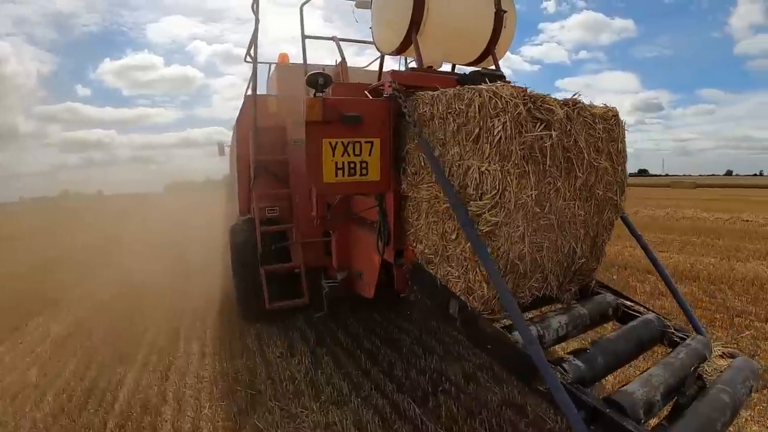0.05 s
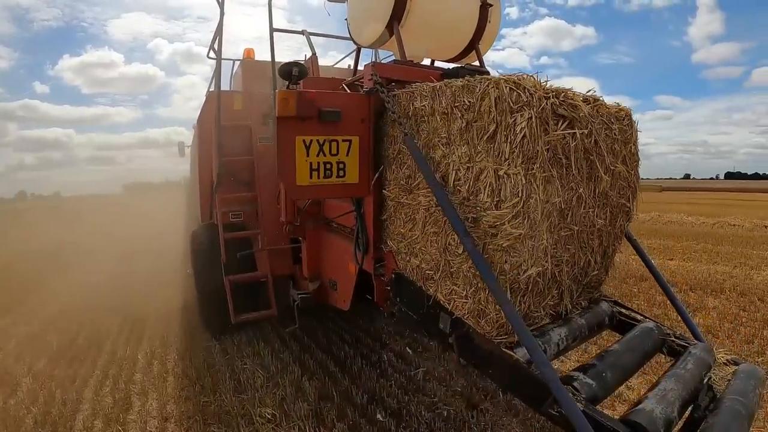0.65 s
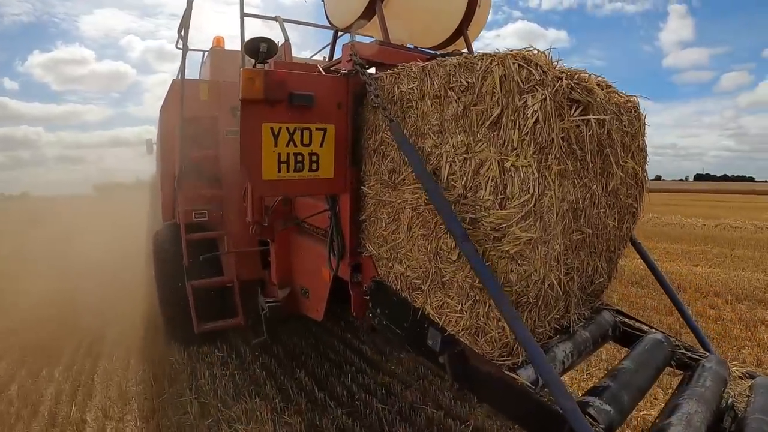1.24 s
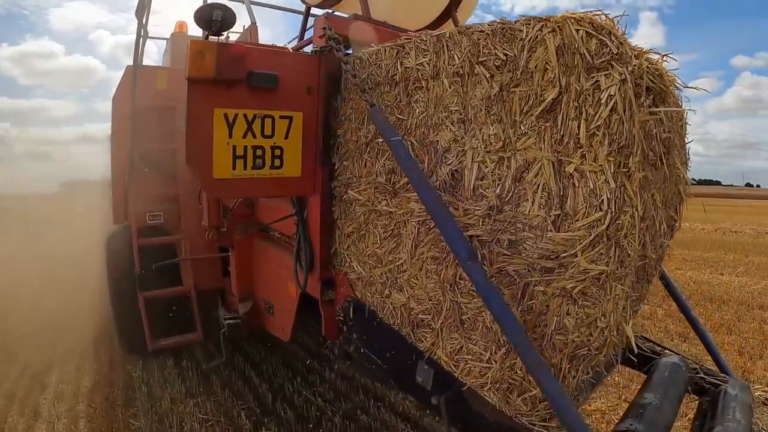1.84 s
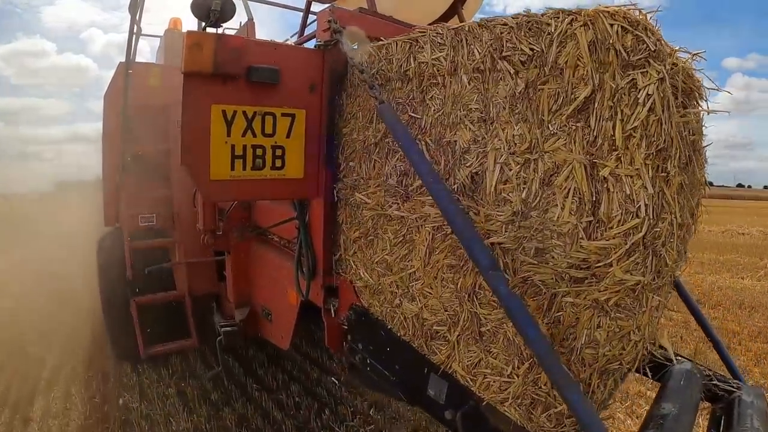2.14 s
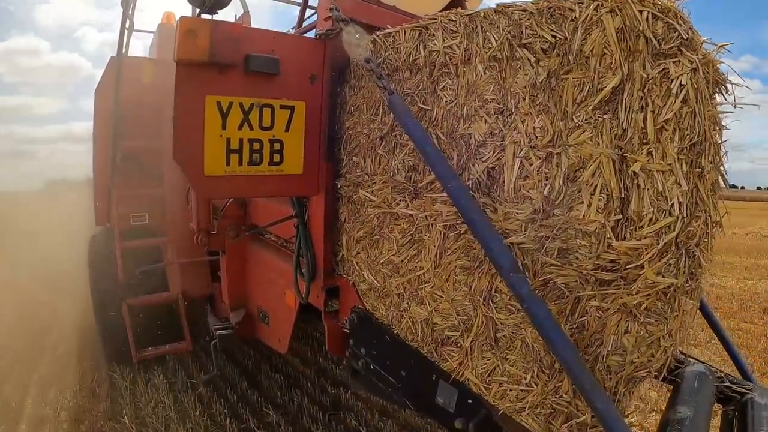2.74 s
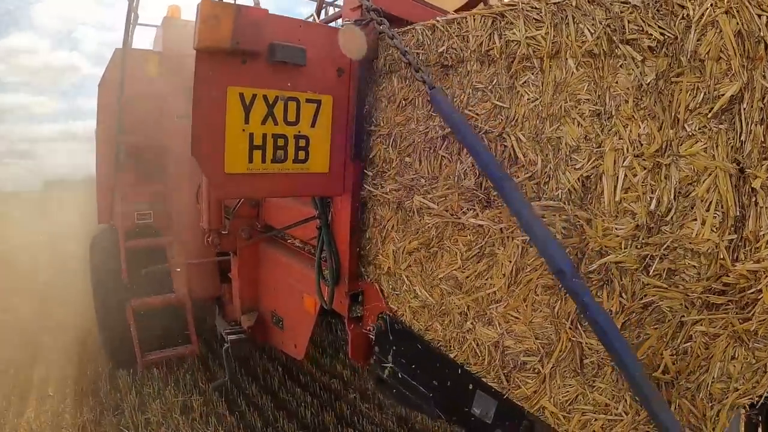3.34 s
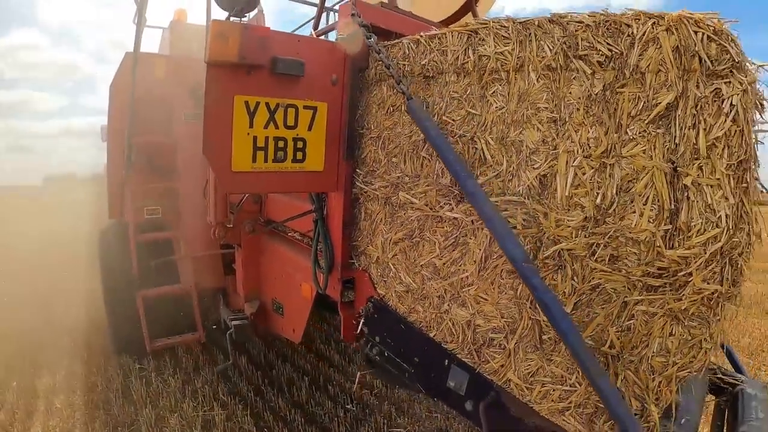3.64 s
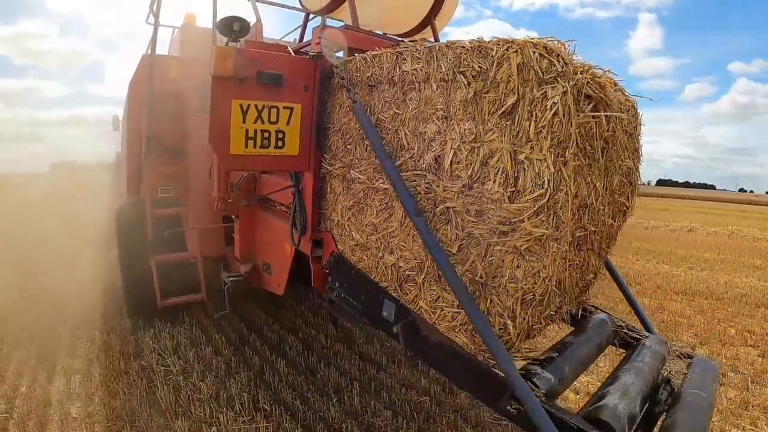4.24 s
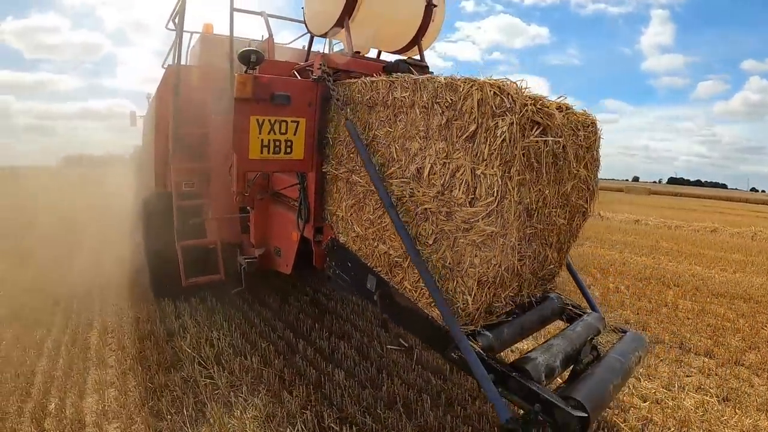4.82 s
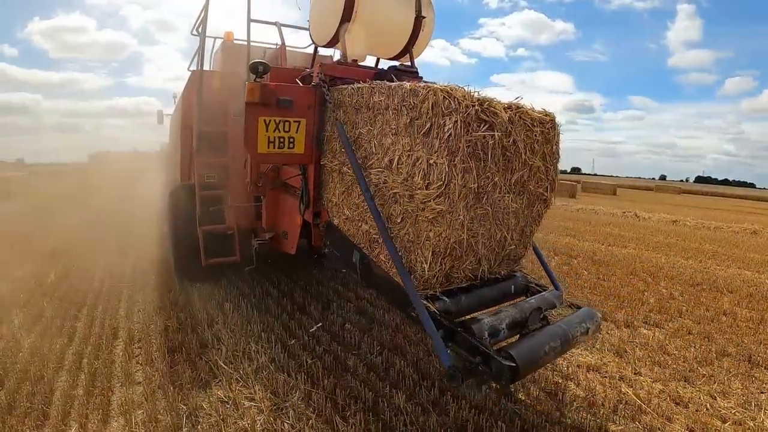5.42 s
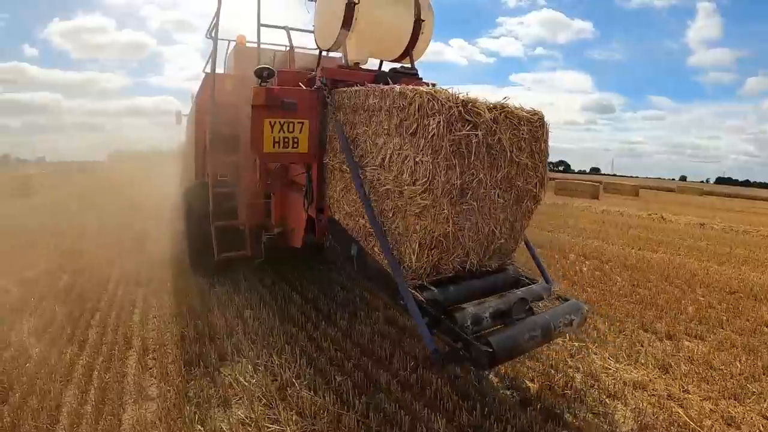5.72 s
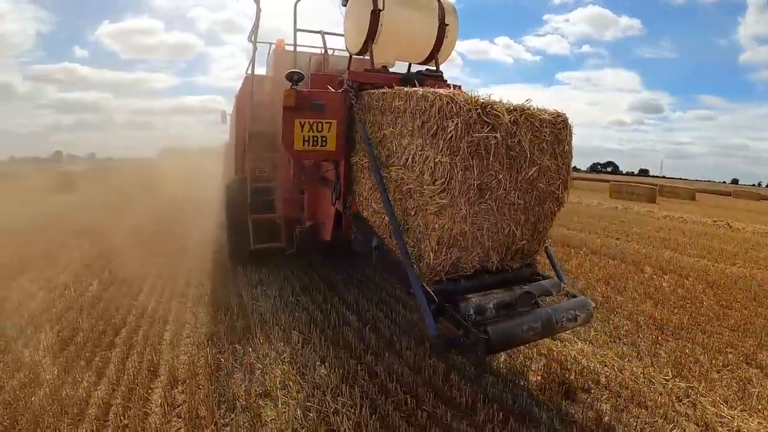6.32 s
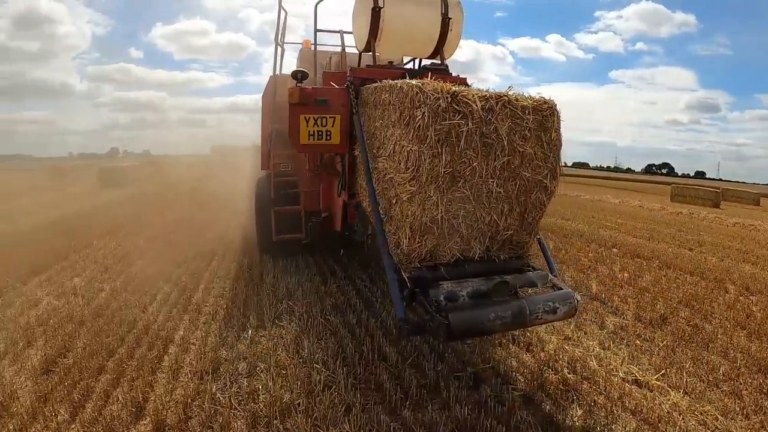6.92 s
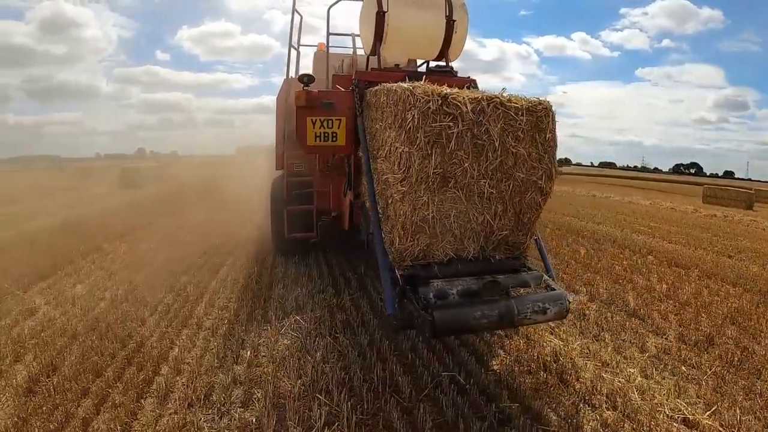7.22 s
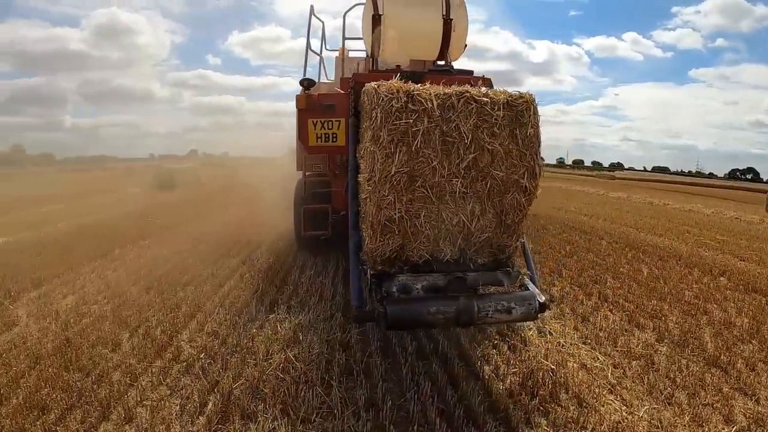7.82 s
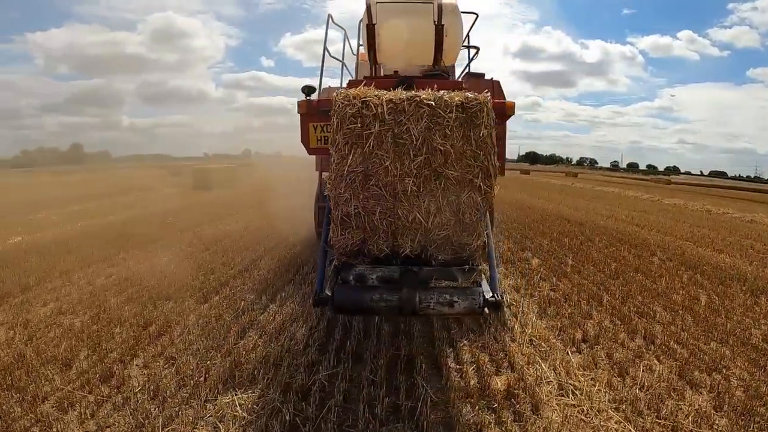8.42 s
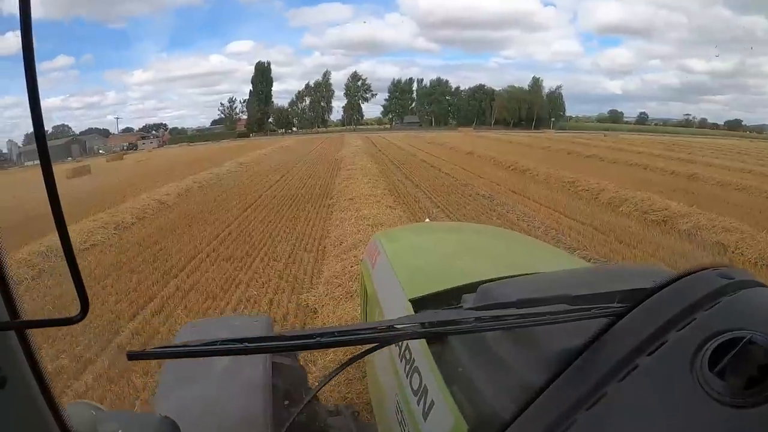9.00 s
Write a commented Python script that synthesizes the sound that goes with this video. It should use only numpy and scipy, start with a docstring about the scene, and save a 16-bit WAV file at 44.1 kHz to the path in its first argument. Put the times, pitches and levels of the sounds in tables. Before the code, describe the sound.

Close behind a working straw baler in an open field, a diesel engine drones under rattling steel, rustling straw and the fast, even clatter of pickup tines. About every second and a half a metal arm slams, followed by a straw crunch and a deep thump, with faint squeaks here and there. Near the end the sound cuts off, and after a short silence a muffled engine hum fades in, heard inside the cab.

```python
"""An engine drones and steel rattles as a tractor pulls a square baler, heard from behind the bale chute.
Straw rustles, the pickup's spring tines clatter ten times a second and dry pivots squeak.
Every 1.5 s the feeder arm slams back, then the plunger rams straw with a crunch and a thump.
The field sound cuts off. After a short silence the diesel engine fades in, heard from the cab."""
import sys
import numpy as np
from scipy import signal
from scipy.fft import rfft, irfft, next_fast_len
from scipy.io import wavfile
from scipy.ndimage import map_coordinates

SR = 44100
rng = np.random.default_rng(int(sys.argv[2]) if len(sys.argv) > 2 else 0)


def unload_wav(signal):
    """Save mono or channel-first audio to the path in sys.argv[1] as 16-bit WAV at rate SR, clipped to [-1, 1]."""
    wavfile.write(
        sys.argv[1],
        SR,
        np.round(np.clip(np.atleast_2d(signal).T, -1, 1) * 32767).astype(np.int16),
    )


N = 403956

# Levels in the tables are relative: the functions set how loud each sound is in the mix.
# Diesel exhaust tones. Each row: multiple of the firing rate, level in dB.
EXHAUST_TONES = [(.5, -19.5), (1, 3.5), (1.5, 0.5), (2, -1.5), (2.5, -11.5), (3, -27), (3.8, -14), (7, -18),
                 (7.4, -17.5), (8, -23.5)]
# The tone colour of each noisy sound. Each row: frequency in Hz, level there in dB.
CHASSIS_SPECTRUM = [(18, -26), (35, -6), (60, -1), (90, -0.5), (140, -3), (190, -9), (300, -20), (420, -22),
                    (700, -32), (2000, -78)]
PANEL_SPECTRUM = [(110, -6), (190, 4), (300, 4), (400, 2), (640, -6.5), (1000, -2.5), (2000, -8),
                  (3000, -14), (4500, -20.5), (7500, -31.5), (10000, -56.5), (15000, -69.5)]
STRAW_SPECTRUM = [(300, 0.5), (1000, 0), (2500, -8), (5000, -9.5), (7500, -12), (10000, -25), (12500, -33),
                  (15500, -68)]
CRASH_SPECTRUM = [(300, 4.5), (520, 10.5), (1000, 5), (1700, 8.5), (2400, 0.5), (3900, -6.5), (5000, -7.5),
                  (7500, -17), (10000, -33), (15000, -53.5)]
TINE_SPECTRUM = [(500, 8), (1500, -3), (2750, 3.5), (3200, -2), (4200, 5.5), (5200, -3), (6200, -21.5),
                 (7500, -8.5), (10000, -39), (15000, -55.5)]
CRACK_SPECTRUM = [(800, -1), (2000, 0.5), (3000, -5.5), (3800, 2.5), (5000, 3.5), (6500, -17),
                  (8500, -16.5), (11000, -35.5), (15000, -37)]
CRUNCH_SPECTRUM = [(400, 3), (1000, 4.5), (2000, 2), (3000, 1), (4500, 1), (5600, -10.5), (7500, -16.5),
                   (10000, -36.5), (15000, -56)]
CAB_SPECTRUM = [(30, -1.5), (60, -15.5), (140, 0), (220, -8), (350, -8), (560, -16), (660, -15),
                (850, -20.5), (1400, -20.5), (1550, -26), (2050, -28.5), (2600, -31.5), (4000, -38),
                (7000, -54), (14000, -85)]
# The modes (ringing notes) of each part. Each row: pitch in Hz, level in dB, seconds to fade by 60 dB.
FRAME_MODES = [(184.1, -5, 0.37), (237.1, -7, 0.27), (281.8, -5.5, 0.17), (346, -6.5, 0.079),
               (398.7, 1, 0.081), (470, -1, 0.052), (539.5, -1.5, 0.055), (667, -6.5, 0.037),
               (758, -6.5, 0.03), (933, -8, 0.05), (1038, -7, 0.041)]
CHAMBER_MODES = [(76, -2, 0.39), (94.6, 1, 0.42), (125, -21, .12), (185.3, -0.5, 0.086),
                 (367, -14.5, 0.071)]
TINE_MODES = [(2870, 1, 0.016), (3100, -4.5, 0.012), (3240, 0.5, 0.012), (3760, 1.5, .016),
              (4310, -8, 0.0088), (4780, -3, 0.0085), (5305, -3, 0.013), (6640, -5.5, 0.013)]
STOP_MODES = [(910, -10, 0.025), (1630, -4.5, 0.013), (2630, 8.5, 0.022), (3660, 10, 0.02),
              (4110, -2.5, 0.018), (4300, 0.5, 0.0099), (4820, -1.5, 0.016)]
# The ringing of tines and stop is softened above about 8 kHz. Each row: frequency in Hz, gain in dB.
RING_TREBLE_ROLLOFF = [(6500, 4.5), (8000, -3), (11000, -10)]
# The load swells as the arm lands and lifts straw, and as the plunger rams, packs and turns.
# Each row: share of the cycle, half width in cycles, dB above idle.
LOAD_SWELLS = [(0.049, 0.041, 4), (0.438, 0.094, 5.5), (0.662, 0.045, 10.5), (0.73, 0.031, 8),
               (0.796, 0.031, 6.5)]
# The machine draws nearer, falls back and moves behind the bale.
# Each row: time in seconds, steel gain in dB, frame gain in dB, left microphone delay in ms.
NEARNESS = [(0, 2, 1, 0.013), (1.3, 0.35, 2.5, 0.0051), (3.0, 1.5, 4, 0.0063), (5.8, 0.5, 0, 0.013),
            (7.5, -3.5, 2.5, 0.028), (8.2, -4.5, -2.5, 0.037), (8.6, -9, -1, 0.055)]
# The linkage knocks in every cycle. Each row: share of the cycle, boom in dB, crash in dB.
LINKAGE_KNOCKS = [(.315, -17.5, -26), (.375, -16, -32.5), (.466, -23.5, -55), (.588, -13, -30.5),
                  (.622, -11, -39), (.648, -9.5, -29.5), (.782, -12, -31.5)]
# The pickup comes out from behind the wheel. Each row: time in seconds, gain in dB.
PICKUP_LEVEL = [(0, -3), (2.5, -1), (4.5, -6), (5.5, 1), (6.8, 2), (7.6, 0.5), (8.2, -3.5), (8.6, -2.5)]
# Dry pivots. Each row: start and length in seconds, pitch in Hz, level in dB, waver as a share of pitch.
PIVOT_SQUEAKS = [(0.239, 0.11, 7050, -48.5, 0.013), (1.74, 0.096, 7020, -51.5, 0.013),
                 (1.904, 0.042, 7250, -48, .002), (3.312, 0.065, 7000, -50, 0.014),
                 (4.783, 0.056, 7250, -49.5, 0.013), (6.291, 0.03, 7220, -49, 0.011),
                 (7.92, .04, 7160, -52, .002), (7.421, 0.29, 1573, -43, 0.008),
                 (7.581, 0.1, 1057, -36, 0.03), (8.399, 0.076, 755, -41.5, 0.08),
                 (8.449, 0.11, 1070, -45.5, 0.062), (8.564, 0.024, 5250, -44, 0.024)]
# A slam of the feeder arm starts each cycle.
# Each row: start in seconds, then boom, crash and snap in dB, then rebound time in seconds.
ARM_SLAMS = [(0.365, -11.5, -21, -26.5, 0.065), (1.896, -14, -22.5, -27.5, 0.06),
             (3.396, -11, -22, -23.5, 0.076), (4.9, -10.5, -23.5, -23.5, 0.073),
             (6.402, -6, -21.5, -25.5, .054), (7.914, -9, -17.5, -31.5, 0.074)]
# The arm bounces twice. Each row: delay in rebound times, boom change in dB, crash change in dB.
ARM_BOUNCES = [(1.004, -1.5, -7), (1.801, -14, -26)]
# Extra jolts: second hits just after slams and knocks, plus a few lone bumps.
# Each row: start in seconds, then boom, crash and thump in dB.
EXTRA_JOLTS = [(0.977, -31, -25.5, -32), (1.088, -10.5, -27, -9.5), (2.503, -22, -27.5, -21),
               (3.418, -8.5, -26, -17), (4.191, -41, -29.5, -26), (4.937, -7.5, -26, -19),
               (6.086, -8.5, -29.5, -23), (6.461, -16, -35.5, -16), (6.764, -30, -35, -12),
               (7.934, -17, -31, -25), (8.412, -14, -40, -35)]
# The plunger crunches through straw. Each row: start in seconds, level in dB.
STRAW_CRUNCHES = [(1.285, -17.5), (1.359, -22), (1.55, -28), (2.794, -18), (2.868, -24.5), (2.96, -28),
                  (4.306, -19.5), (4.377, -20), (4.575, -25), (5.805, -18.5), (5.888, -18.5), (5.99, -26.5),
                  (6.08, -26.5), (7.324, -19), (7.4, -20), (7.503, -25)]
# The cab fades in. Each row: time in seconds, exhaust in dB, roar in dB.
CAB_FADE = [(8.81, -94, -98), (8.85, -33, -42), (8.89, -17, -26), (8.98, -19, -19), (9.16, -22, -18.5)]
# Gears whine in the cab. Each row: pitch in Hz, dB compared with the roar.
GEAR_WHINE = [(650, -16.5), (1680, -22.5), (2121, -27.5)]
# The machine stands a little to the left. Each row: frequency in Hz, left minus right in dB.
LEFT_LEAN = [(60, 2), (400, 1.1), (1000, 1.5), (2500, 4.5), (4500, 4), (8000, 0.5)]
# Sound scattered by bale and ground. Each row: frequency in Hz, gain in dB.
SCATTER = [(100, -20.5), (330, -11), (550, -8), (2000, -5.5), (4000, -6.5), (8000, 0), (13000, 6)]

FIRING_HZ, CYCLE_S, CLASHES_PER_CYCLE = 92.6, 1.51, 15
DRONE_IDLE_DB, PANELS_IDLE_DB, FRAME_IDLE_DB, STRAW_IDLE_DB, CLASH_IDLE_DB = -19, -35, -29.5, -44.5, -25
DRONE_FOLLOWS, FRAME_FOLLOWS, STRAW_FOLLOWS, CLASH_FOLLOWS = 0.14, 0.49, 0.2, 0.25   # dB per dB of load
STROKE_END_SHARE, THUMP_DB = .782, -5.5   # where the plunger turns round, and how hard
FIELD_END_S, CUTOFF_HZ = 8.627, 15000


def amp(db):
    """Turn decibels into a gain."""
    return 10 ** (np.asarray(db) / 20)


def unit(x):
    """Scale a signal to an average power of 1."""
    return x / np.sqrt(np.mean(x ** 2) + 1e-20)


def seconds():
    """The time of every sample."""
    return np.arange(N) / SR


def curves(rows):
    """Join timed rows with straight lines, one curve a column."""
    s, *columns = np.transpose(rows)
    return [np.interp(seconds(), s, c) for c in columns]


def gains(points):
    """Turn rows of Hz and dB into a gain for every frequency."""
    hz, db = np.transpose(points)
    all_hz = np.fft.rfftfreq(next_fast_len(N, True), 1 / SR)
    return amp(np.interp(np.log(all_hz + 1), np.log(hz), db))


def shape(x, gain):
    """Turn each frequency up or down by its gain."""
    size = next_fast_len(N, True)
    return irfft(rfft(x, size) * gain, size)[..., :N]


def colour(x, spectrum):
    """Give white noise a tone colour and keep its power."""
    return shape(x, unit(gains(spectrum)))


def drift(rate):
    """A random wander of size about 1, changing about rate times a second."""
    knots = rng.standard_normal(8192)
    return unit(np.interp(seconds() * rate, np.arange(len(knots)), knots))


def contacts(per_s, spread_db):
    """Tiny collisions at random times; spread_db makes their sizes uneven."""
    sizes = amp(spread_db * np.minimum(rng.exponential(1, N), 3)) * rng.choice([-1, 1], N)
    return unit(sizes * (rng.random(N) < per_s / SR))


def bursts(times, levels_db, rise_s, fall_s):
    """The loudness curve of blows that build up quickly and die away."""
    power, age = np.zeros(N + SR), np.arange(SR // 2) / SR
    blow = np.minimum(age / rise_s, 1) * np.exp(-np.maximum(age - rise_s, 0) / fall_s)
    for s, db in zip(times, levels_db):
        start = max(int(s * SR), 0)
        power[start:start + len(age)] += (amp(db) * blow) ** 2
    return np.sqrt(power[:N])


def ring(force, modes, shift_db=0):
    """A struck part rings at a few notes, whose strengths shift with the point of contact."""
    out, power = 0, 0
    for k, (hz, db, t60) in enumerate(modes):
        decay, step = amp(-60 / (t60 * SR)), 2 * np.pi * hz / SR
        mode = signal.lfilter([0, np.sin(step)], [1, -2 * decay * np.cos(step), decay ** 2], force + 1e-18)
        out += (-1) ** k * amp(db) * unit(amp(shift_db * drift(14))) * mode
        power += amp(db) ** 2 / (2 * (1 - decay ** 2))
    return out / np.sqrt(power)


def sheet(force, t60, count):
    """Each collision lands on one of count steel sheets, whose noisy ring fades 60 dB in t60 seconds."""
    age, target = np.arange(SR // 5) / SR, rng.integers(0, count, N)
    tails = rng.standard_normal((count, len(age))) * amp(-60 * age / t60)
    return sum(signal.oaconvolve(force * (target == k), tail / np.linalg.norm(tail))[:N]
               for k, tail in enumerate(tails))


def cycle_starts():
    """The slam times, with one more cycle before and after."""
    s = np.transpose(ARM_SLAMS)[0]
    return np.concatenate([[s[0] - CYCLE_S], s, [s[-1] + CYCLE_S]])


def cycle_share():
    """How much of the cycle has gone by at every sample, from 0 to 1."""
    starts = cycle_starts()
    return np.interp(seconds(), starts, np.arange(len(starts))) % 1


def every_cycle(rows):
    """Repeat rows in every cycle, turning their first column from a share into seconds."""
    starts = cycle_starts()
    events = np.array([(start + share * (end - start), *rest)
                       for start, end in zip(starts, starts[1:]) for share, *rest in rows])
    return events[events[:, 0] > 0]


def load():
    """How hard the baler works, in dB above idle: the same swells return in every cycle."""
    now = cycle_share()
    return sum(db * np.exp(-((now - share) / width) ** 2) for share, width, db in LOAD_SWELLS)


def diesel(wander, rough):
    """An unsteady crank gives wavering exhaust tones and a puff at each firing."""
    phase = 2 * np.pi * np.cumsum(FIRING_HZ * (1 + wander * drift(14))) / SR
    tones = sum(amp(db) * (1 + rough * drift(35)) * np.sin(k * phase + rng.uniform(0, 2 * np.pi))
                for k, db in EXHAUST_TONES)
    puffs = unit(1 + 0.11 * np.cos(phase))
    return unit(tones), puffs


def engine_drone(load_db):
    """The working engine drones over the rumble of the rolling chassis."""
    tones, _ = diesel(wander=0.0246, rough=0.88)
    exhaust = shape(tones, gains([(50, -14), (93, 2.5), (140, -3), (600, -5)]))
    rumble = colour(contacts(per_s=1800, spread_db=1), CHASSIS_SPECTRUM)
    return amp(DRONE_IDLE_DB + DRONE_FOLLOWS * load_db) * (amp(-10) * exhaust + amp(-1.86) * rumble)


def body_rattle(load_db, steel_db, frame_db):
    """Panels chatter and the frame hums as the plunger loads them."""
    panels_db = PANELS_IDLE_DB + load_db + steel_db + 2.46 * drift(25)
    shaking = amp(panels_db) * contacts(per_s=2200, spread_db=2.5)
    panels = colour(sheet(shaking, t60=0.027, count=6), PANEL_SPECTRUM)
    strain_db = 0.5 * np.cos(2 * np.pi * (cycle_share() - .83))   # most when the bale is squeezed
    hum_db = FRAME_IDLE_DB + FRAME_FOLLOWS * load_db + strain_db + frame_db
    hum = ring(amp(hum_db) * contacts(per_s=900, spread_db=4), FRAME_MODES, shift_db=3)
    return panels + amp(-6) * hum


def straw_rustle(load_db):
    """Straw rustles in uneven wads, more under load and just after each pass of the tines."""
    toss_db = 0.3 * np.cos(2 * np.pi * (CLASHES_PER_CYCLE * cycle_share() - .35))
    wads_db = 2.45 * drift(6.9)
    rustle = colour(contacts(per_s=14000, spread_db=3), STRAW_SPECTRUM)
    return amp(STRAW_IDLE_DB + STRAW_FOLLOWS * load_db + toss_db + wads_db) * rustle


def heavy_blows(steel_db, frame_db):
    """Knocks, slams, bounces and jolts crash on steel; a shove and a judder set the frame booming."""
    hits = [row[:3] for row in ARM_SLAMS + EXTRA_JOLTS]
    bounces = [(s + delay * rebound_s, db + softer, crash_db + duller)
               for s, db, crash_db, _, rebound_s in ARM_SLAMS for delay, softer, duller in ARM_BOUNCES]
    s, boom_db, crash_db = np.vstack([hits, bounces, every_cycle(LINKAGE_KNOCKS)]).T
    impacts = bursts(s - .003, crash_db, rise_s=0.006, fall_s=0.016) * contacts(per_s=6000, spread_db=0)
    judder = bursts(s - .003, boom_db, rise_s=0.0039, fall_s=0.032) * contacts(per_s=3000, spread_db=1)
    shove = np.zeros(N + 2 * SR)
    shove[((s + .003) * SR).astype(int)] = amp(boom_db)
    force = amp(frame_db) * (amp(-8.5) * judder + amp(12.5) * shove[:N])
    crash = colour(sheet(amp(steel_db) * impacts, t60=0.058, count=2), CRASH_SPECTRUM)
    return amp(1.5) * crash + ring(force, FRAME_MODES, shift_db=1.5)


def plunger_thumps():
    """A soft, heavy push rings the bale chamber at the end of each stroke and at each jolt."""
    strokes = every_cycle([(STROKE_END_SHARE, THUMP_DB)])
    jolts = [(s, db) for s, _, _, db in EXTRA_JOLTS]
    s, db = np.vstack([strokes, jolts]).T
    force = np.zeros(N)
    force[(s * SR).astype(int)] = amp(db)
    return amp(24) * ring(force, CHAMBER_MODES)


def pickup_clatter(load_db):
    """Geared to the plunger, the pickup's tines clash evenly, each time in a shower of tiny contacts."""
    s = every_cycle([(k / CLASHES_PER_CYCLE,) for k in range(CLASHES_PER_CYCLE)])[:, 0]
    late, hard = rng.standard_normal((len(s), 2)).T
    starts = np.maximum(s + 0.0027 + 0.0013 * late, 0)
    db = CLASH_IDLE_DB + CLASH_FOLLOWS * np.interp(s, seconds(), load_db) + 1.8 * hard
    shower = bursts(starts, db, rise_s=.015, fall_s=0.028) * contacts(per_s=2000, spread_db=1.5)
    clash = colour(sheet(shower, t60=0.013, count=3), TINE_SPECTRUM)
    # the treble varies: clashes deep inside the machine come out duller
    treble = shape(clash, gains([(2500, -48.5), (5000, -4)]))
    clash += (amp(1.3 * drift(22)) - 1) * treble
    ringing = shape(tine_ring(shower, starts), gains(RING_TREBLE_ROLLOFF))
    return amp(-14.5) * clash + amp(-18) * ringing


def tine_ring(shower, times, detune_share=0.071, shift_db=0.5):
    """Each clash rings another tine. No two are bent alike, so each has its own tuning and balance."""
    out, age = np.zeros(N + SR), np.arange(SR // 12) / SR
    hz, db, t60 = np.transpose(TINE_MODES)[..., None]
    edges = (times[times < N / SR] * SR).astype(int)
    for start, end in zip(edges, [*edges[1:], N]):
        bent, hit = rng.standard_normal((2, len(hz), 1))
        fades = amp(db + shift_db * hit - 60 * age / t60)
        ping = np.sum(fades * np.sin(2 * np.pi * hz * (1 + detune_share * bent) * age), axis=0)
        rung = signal.fftconvolve(shower[start:end], ping / np.linalg.norm(ping))
        out[start:start + len(rung)] += rung
    return out[:N]


def pivot_squeaks():
    """Dry steel sings briefly on an unsteady pitch, with a faint octave above."""
    out, waver, grip = np.zeros(N), drift(700), amp(3.9 * drift(250))
    for s, length, hz, db, share in PIVOT_SQUEAKS:
        at = np.arange(int(s * SR), int((s + length) * SR))
        phase = 2 * np.pi * np.cumsum(hz * (1 + share * waver[at])) / SR
        tone = np.sin(phase) + amp(-32) * np.sin(2 * phase)
        out[at] += amp(db + 7.5) * signal.windows.tukey(len(at), .55) * grip[at] * tone
    return out


def stop_snaps():
    """The steel stop cracks and rings as the feeder arm meets it, on the rebound, and at each jolt."""
    slams = [(s, db) for s, _, _, db, _ in ARM_SLAMS]
    rebounds = [(s + rebound_s, db - 7) for s, _, _, db, rebound_s in ARM_SLAMS]
    jolts = [(s, crash_db - 5.5) for s, _, crash_db, _ in EXTRA_JOLTS]
    s, db = np.vstack([slams, rebounds, jolts]).T
    chatter = bursts(s - .003, db, rise_s=0.0059, fall_s=0.015) * contacts(per_s=3200, spread_db=2)
    crack = colour(sheet(chatter, t60=0.01, count=3), CRACK_SPECTRUM)
    ringing = shape(ring(chatter, STOP_MODES, shift_db=-2.5), gains(RING_TREBLE_ROLLOFF))
    return amp(-1.5) * crack + amp(-3.5) * ringing


def straw_crunches():
    """Stalks snap in a dense burst between the plunger knife and the chamber wall."""
    s, db = np.transpose(STRAW_CRUNCHES)
    snaps = bursts(s - .003, db, rise_s=0.013, fall_s=0.023) * contacts(per_s=2700, spread_db=-0.5)
    return amp(-3) * colour(sheet(snaps, t60=0.019, count=3), CRUNCH_SPECTRUM)


def cab_engine():
    """In the cab the exhaust hums, gears whine and a rough roar pulses with the firings."""
    exhaust_db, roar_db = curves(CAB_FADE)
    tones, puffs = diesel(wander=0.005, rough=0.29)
    roar = unit(puffs * amp(1.1 * drift(60)) * contacts(per_s=5400, spread_db=1))
    phase_per_hz = 2 * np.pi * np.cumsum(1 + 0.0033 * drift(20)) / SR
    whine = sum(amp(db + 2.5 * drift(9.9)) * np.sin(hz * phase_per_hz) for hz, db in GEAR_WHINE)
    return amp(exhaust_db - 1) * tones + amp(roar_db) * (colour(roar, CAB_SPECTRUM) + whine)


def microphones(x, lag_ms):
    """Two microphones hear the machine, the left one louder; each also gets its own scattered sound."""
    lean = np.sqrt(gains(LEFT_LEAN))
    late = map_coordinates(x, [np.arange(N) - lag_ms * SR / 1000], order=3)
    # the paths off bale and ground keep changing on the move
    scattered = [shape(sheet(x, t60=0.09, count=1), gains(SCATTER)) * drift(90) for _ in range(2)]
    return np.array([shape(late, lean), shape(x, 1 / lean)]) + scattered


def scene():
    """The baler in the field, a sudden silence, then the cab."""
    load_db = load()
    steel_db, frame_db, lag_ms = curves(NEARNESS)
    baler = body_rattle(load_db, steel_db, frame_db)
    baler += amp(curves(PICKUP_LEVEL)[0]) * pickup_clatter(load_db)
    baler += heavy_blows(steel_db, frame_db) + stop_snaps()
    baler += straw_crunches() + plunger_thumps() + pivot_squeaks()
    field = microphones(engine_drone(load_db) + baler + straw_rustle(load_db), lag_ms)
    field_on = np.clip((FIELD_END_S - seconds()) / 0.003 + 1, 0, 1)
    return field * field_on + cab_engine()


def record(dry):
    """Round off the highest peaks and cut away the very top of the treble."""
    rounded = dry / (1 + np.abs(dry / .85) ** 6) ** (1 / 6)
    return signal.sosfilt(signal.ellip(10, .1, 80, CUTOFF_HZ, fs=SR, output="sos"), rounded)


dry = scene()
out = record(dry)
unload_wav(out)
```